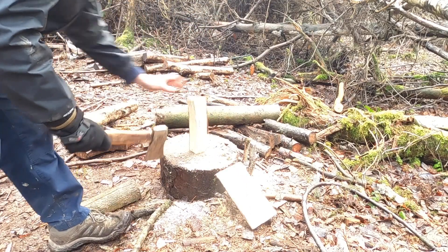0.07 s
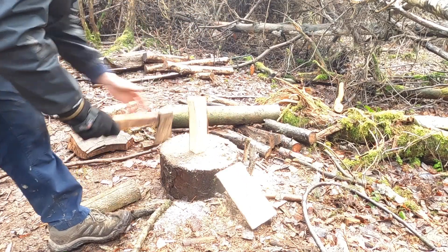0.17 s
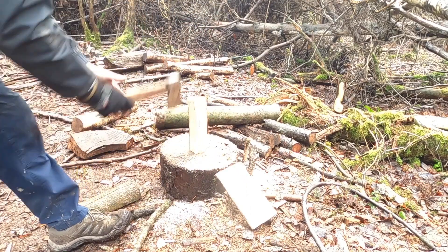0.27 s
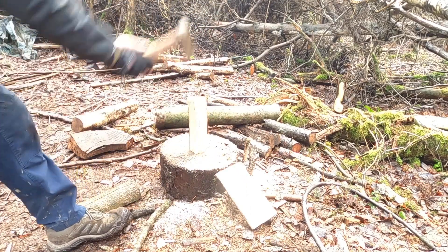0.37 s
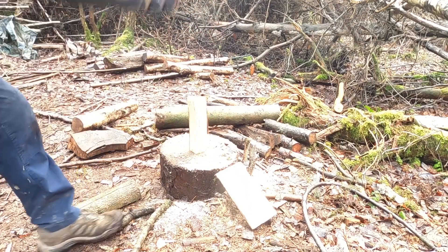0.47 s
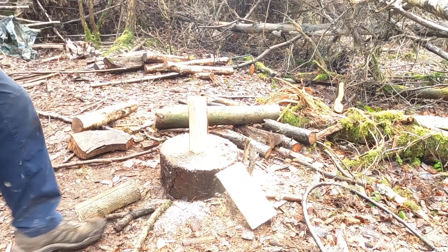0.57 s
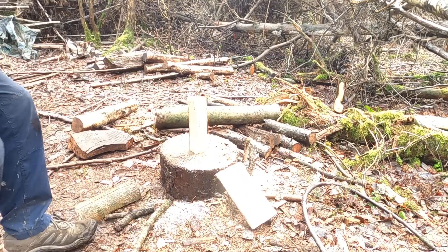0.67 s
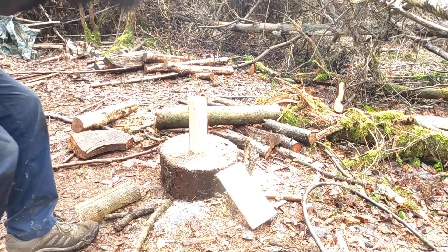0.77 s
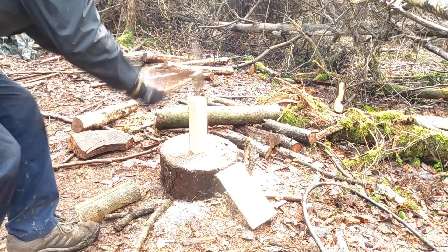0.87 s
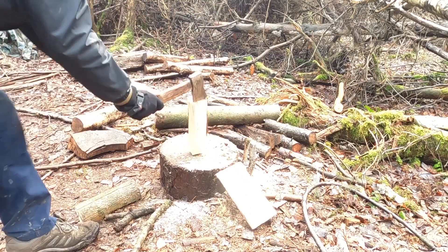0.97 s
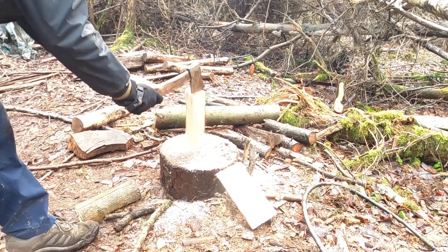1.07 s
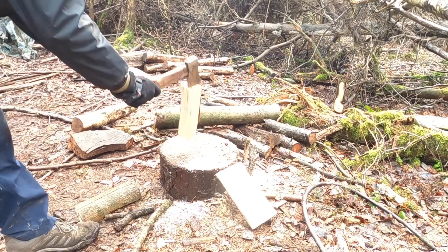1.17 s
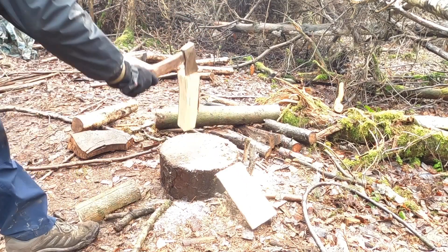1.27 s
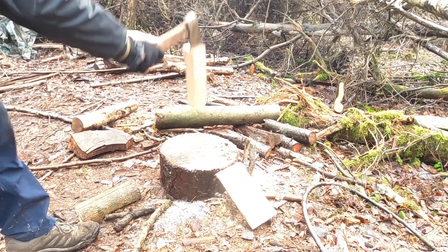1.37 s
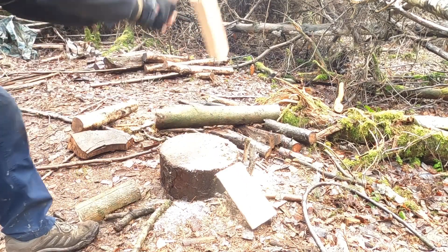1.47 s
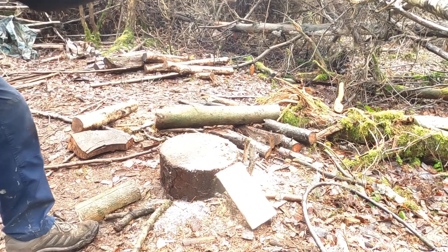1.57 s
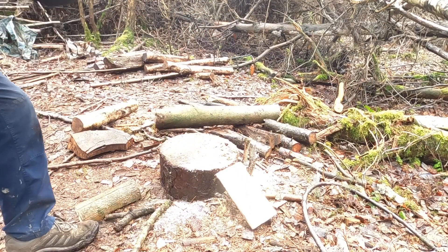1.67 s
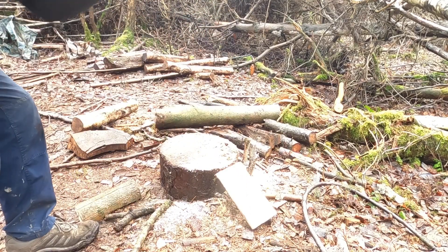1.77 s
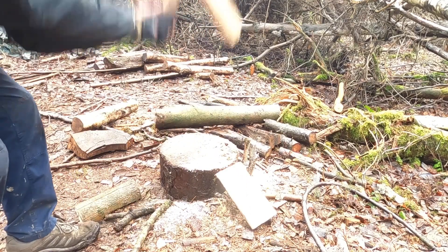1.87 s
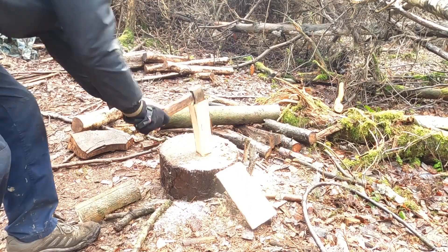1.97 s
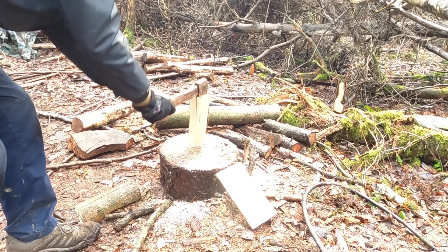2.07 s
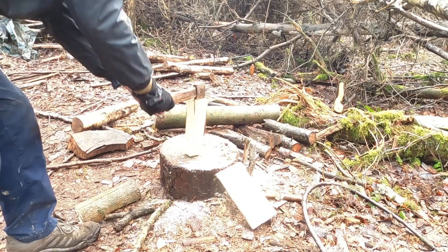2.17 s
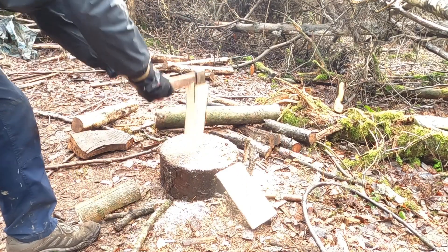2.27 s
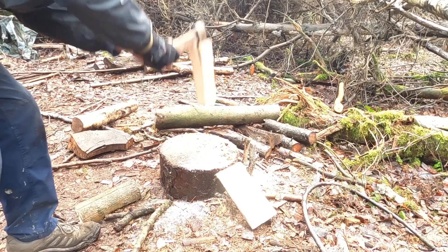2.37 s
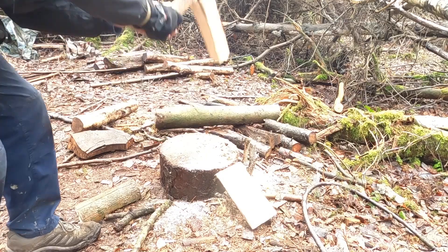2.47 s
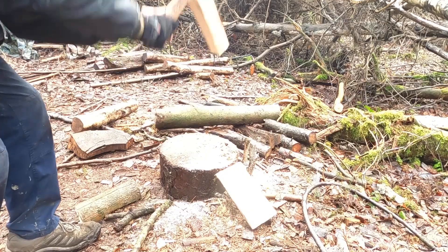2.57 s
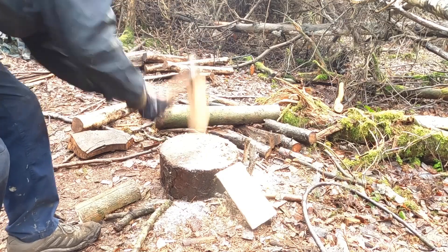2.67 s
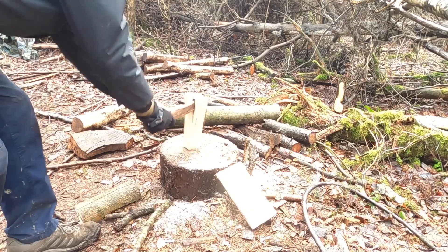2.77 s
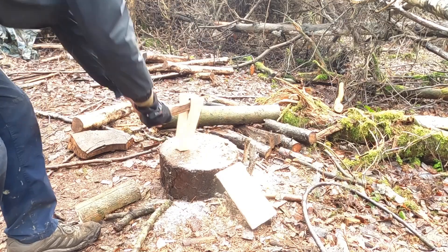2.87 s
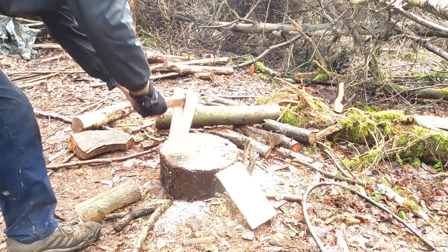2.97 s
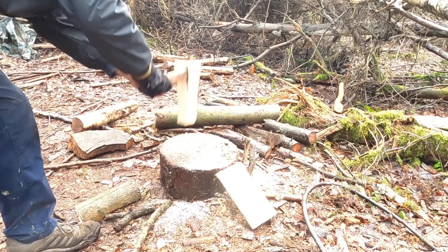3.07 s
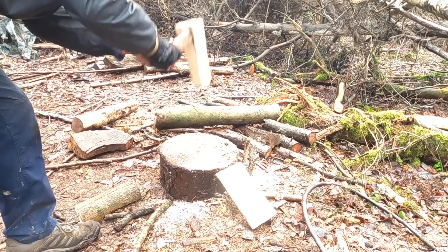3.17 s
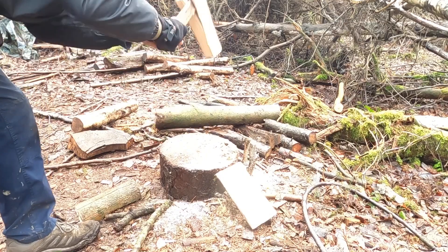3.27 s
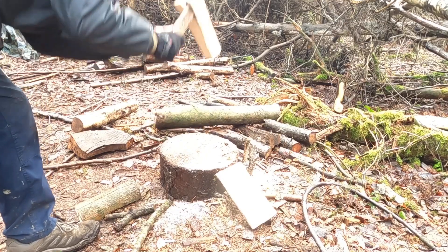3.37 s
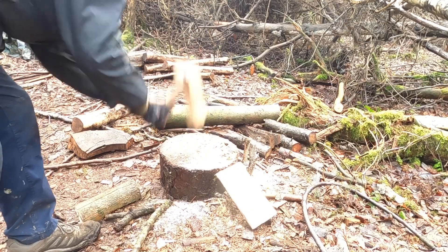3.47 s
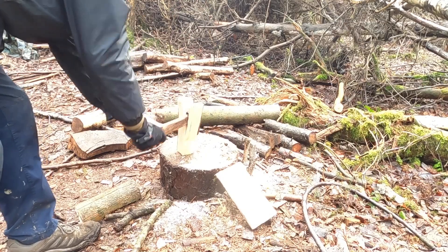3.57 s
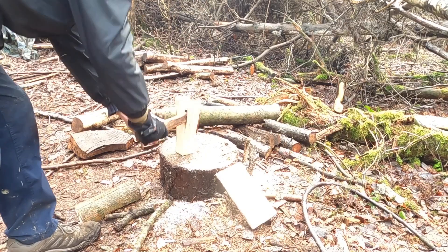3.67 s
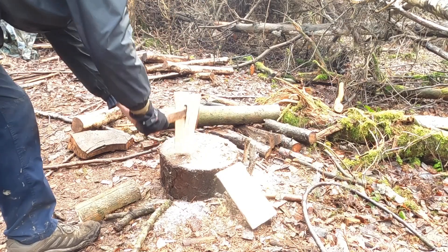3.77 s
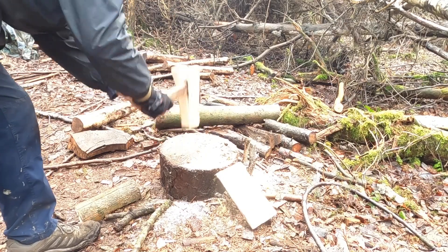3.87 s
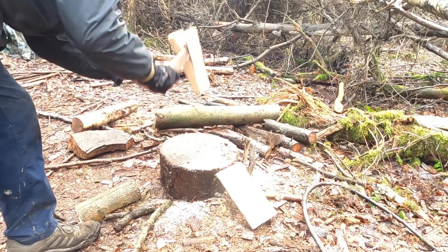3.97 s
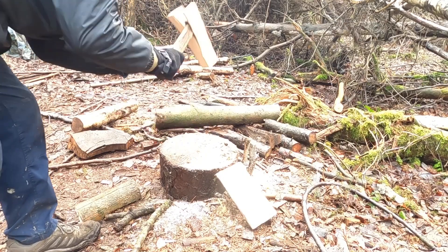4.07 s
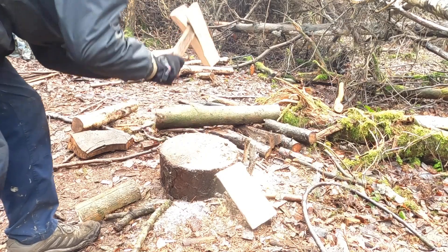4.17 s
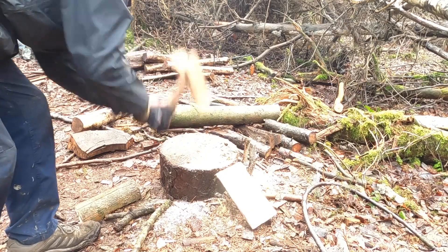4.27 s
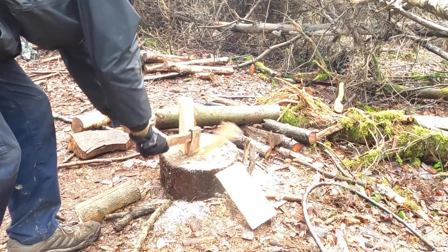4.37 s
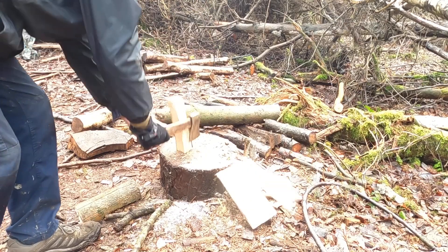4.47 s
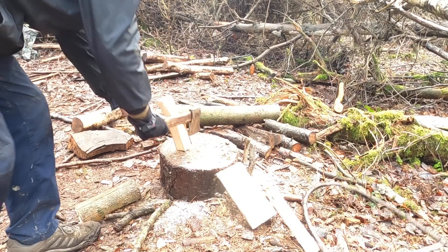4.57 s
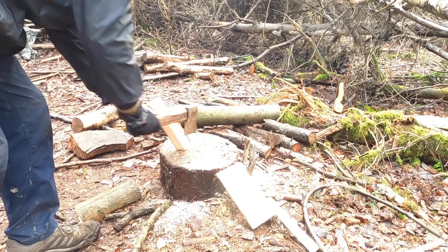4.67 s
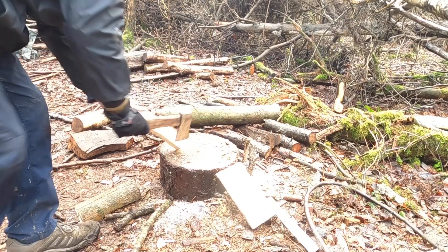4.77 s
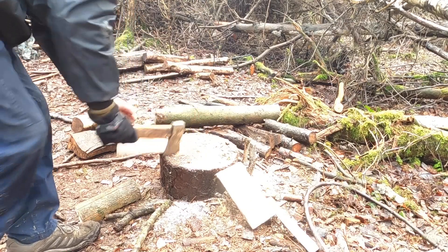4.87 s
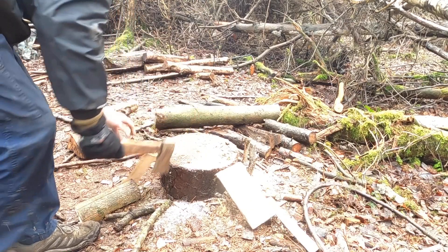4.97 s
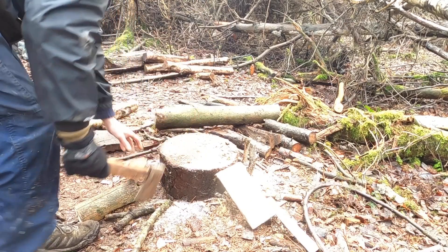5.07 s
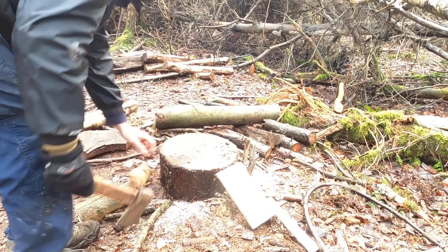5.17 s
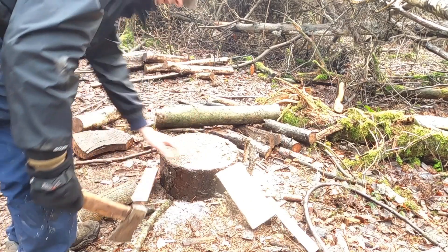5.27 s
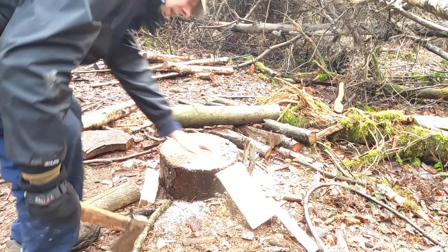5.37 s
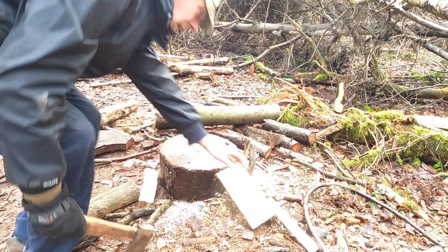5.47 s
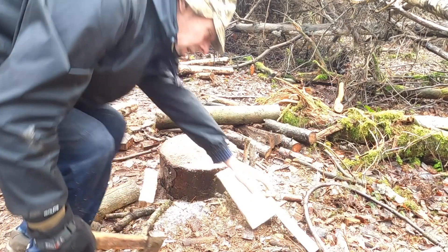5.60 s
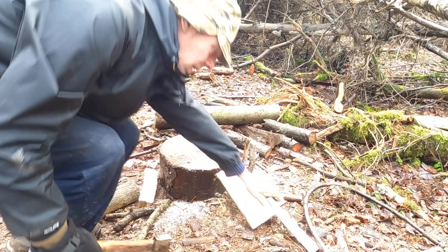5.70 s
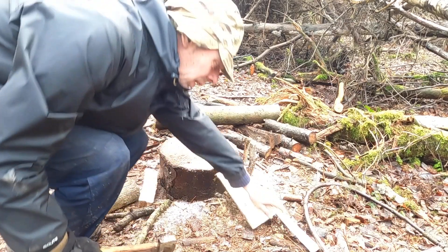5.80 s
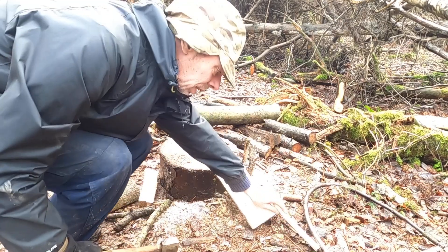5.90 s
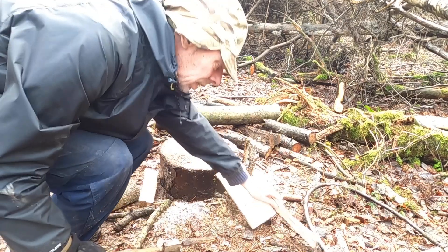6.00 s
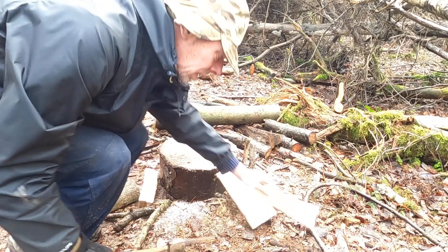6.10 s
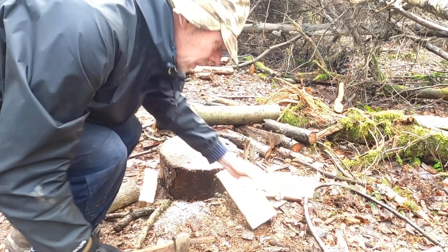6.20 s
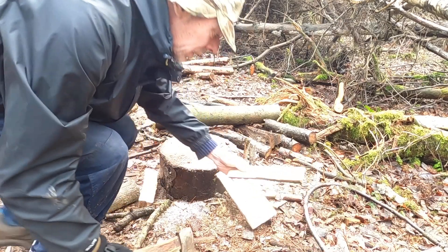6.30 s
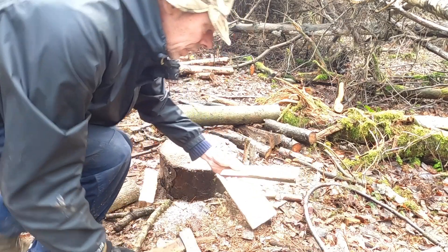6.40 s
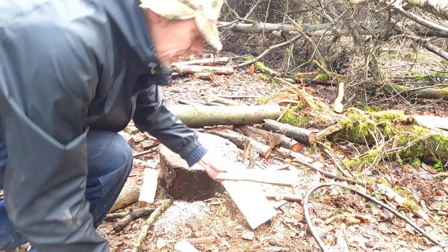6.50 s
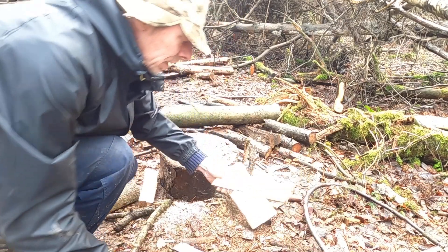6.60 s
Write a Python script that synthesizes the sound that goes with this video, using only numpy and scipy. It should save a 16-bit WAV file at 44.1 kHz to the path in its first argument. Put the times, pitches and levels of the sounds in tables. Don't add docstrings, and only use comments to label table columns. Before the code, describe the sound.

A quiet woodland with low wind rumble and faint far traffic, heard close in stereo. At the start a gust bumps the microphone, a jacket swishes, twigs tick and boots shift softly around 0.4-0.6 s. At 0.9 s a hatchet bites into a dry stick: a loud, hard crack with a short woody ring. The joined stick and hatchet are knocked on a log block at 2.0, 2.7 and 3.5 s, each a sharp knock with tearing fibres, a low soil thud and a late swelling echo from the trunks. At 4.3 s the stick splits; pieces clatter at 4.5-4.7 s and another lands near 5.0 s. A firmer small knock comes at 5.3 s amid brief sliding scrapes. Then cloth rustles, leaves stir, twigs tick and light wooden taps sound around 6.0-6.25 s, ending on a soft scrape and quiet wind by 6.6 s.

```python
import sys
import numpy as np
from scipy import signal
from scipy.fft import rfft, irfft
from scipy.io import wavfile
from scipy.ndimage import uniform_filter1d

SR = 44100
rng = np.random.default_rng(int(sys.argv[2]) if len(sys.argv) > 2 else 0)


def nominal_scale(level):
    x = np.asarray(level, float) / 20
    return 10 ** x


def persist_wave(psi):
    counts = np.round(np.clip(psi, -1, 1) * 32767).astype(np.int16)
    wavfile.write(sys.argv[1], SR, np.atleast_2d(counts).T)


N = 292779

# middle t/s, length/s, level/dB
GUSTS = [(0, 0.055, -27), (.1, 0.47, -43.5), (.3, 0.42, -48), (.5, 0.44, -39), (.76, 0.44, -45.5),
         (.97, 0.18, -36), (1.1, 0.25, -49), (1.45, 0.7, -53), (1.68, 0.23, -46.5), (1.85, 0.35, -48.5),
         (1.96, 0.2, -45), (2.12, 0.16, -48), (2.55, 0.47, -54.5), (3.3, 0.56, -49.5), (3.68, 0.55, -49),
         (4.22, 0.52, -51), (4.55, 0.44, -53), (4.8, 0.88, -52.5), (4.99, 0.21, -45.5), (5.2, 0.21, -46),
         (5.33, 0.13, -47), (5.62, 0.42, -52.5), (5.76, 0.17, -46), (5.97, .22, -45), (6.44, 0.58, -44),
         (6.64, .2, -59)]
# f/Hz, density/dB per Hz
RUMBLE = [(15, -15.5), (30, -1), (58, 0), (90, -8), (130, -21), (220, -34), (400, -58)]
LULL_DB, GUST_SWAY_DB, GUST_PAN_DB = -58, -0.5, 0.5
# f/Hz, correlation/1
LIKENESS = [(40, .75), (130, .85), (300, .75), (700, .72), (1500, .6), (3100, .55), (7000, .45),
            (15000, .2)]
# t/s, level/dB
STIR = [(0, -55.5), (.5, -54.5), (.88, -54.5), (1.0, -66.5), (1.399, -61), (1.96, -57.5), (2.01, -66),
        (2.6, -63.5), (2.849, -61.5), (3.05, -65.5), (3.6, -63), (3.9, -67.5), (4.55, -58), (4.78, -65),
        (5.349, -60), (5.95, -59), (6.201, -59.5), (6.64, -57)]
# f/Hz, density/dB per Hz
AIR = [(100, -11), (320, -16.5), (748, -18), (1840, -21.5), (2050, -33.5), (3050, -49.5), (7670, -44.5),
       (15000, -73)]
# middle t/s, length/s, level/dB
SWISHES = [(.09, 0.26, -66), (.21, 0.17, -70), (.33, 0.36, -64), (.53, 0.62, -60.5), (.7, .14, -63),
           (.83, .22, -57), (1.1, 0.53, -70), (1.36, 0.18, -74.5), (1.48, 0.4, -78), (1.57, .16, -69),
           (1.635, 0.2, -63.5), (1.8, 0.17, -66), (1.88, .15, -68), (2.4, 0.25, -72), (2.85, 0.57, -68.5),
           (3.1, 0.37, -75), (3.4, 0.45, -82), (3.62, 0.45, -72.5), (4.26, 0.14, -82), (4.46, 0.25, -73.5),
           (4.62, .2, -71.5), (4.9, 0.92, -74.5), (5.08, 0.13, -74.5), (5.2, 0.2, -76), (5.33, 0.4, -67),
           (5.65, 1, -67), (5.86, 0.21, -68.5), (6.0, 0.28, -75), (6.17, 0.72, -73.5), (6.48, 0.41, -64.5),
           (6.64, 0.18, -67)]
# f/Hz, density/dB per Hz
RUSTLE = [(500, -8.5), (1000, 4), (2000, 4), (3500, 2.5), (6000, -2.5), (9000, -1), (12000, -16.5),
          (16000, -40)]
DOWNSWINGS = [-64, -59.5, -68, -70, -77]
DOWNSWING_S, STILL_DB = 0.07, -81.5
# t/s, peak level/dB, f/Hz
TICKS = [(0.121, -40, 4400), (0.172, -45, 3800), (0.196, -41.5, 7500), (0.23, -39, 5880),
         (0.3111, -33, 8200), (.715, -40, 2800), (1.5339, -46, 4660), (2.3697, -46, 3376),
         (2.9042, -61, 3370), (2.9795, -37.5, 5000), (3.1004, -42.5, 3990), (3.2367, -48.5, 5200),
         (3.2995, -52, 8000), (3.3295, -51, 3240), (3.487, -41, 1993), (5.038, -54.5, 3165),
         (5.099, -40.5, 6050), (5.276, -46, 3590), (5.6376, -49.5, 3270), (5.7224, -41, 3760),
         (5.8198, -37.5, 4280), (5.8383, -37, 3620), (5.8924, -45, 3600), (5.971, -47.5, 3860),
         (6.1325, -62, 3600), (6.4088, -38, 7500), (6.4962, -35.5, 3160), (6.6218, -38, 7400),
         (4.925, -42, 6000), (4.932, -42, 6500), (4.94, -41, 6500), (1.81, -46, 3000), (1.657, -46, 2200),
         (1.92, -45, 2500), (5.106, -45, 4200), (3.056, -50, 2000), (3.14, -53, 9000), (3.2, -53, 2800),
         (5.757, -50, 8500)]
# t/s, level/dB, f/Hz, t60/s
STEPS = [
    (.42, -40, 380, .03),
    (.463, -37, 260, .03),
    (.485, -36, 330, .025),
    (.56, -37, 410, .05),
    (.85, -38.5, 320, .05),
    (1.57, -46, 300, .05),
    (3.558, -36, 330, .03),
    (3.57, -36, 360, .025),
    (4.965, -42, 520, .04),
    (5.3, -42, 350, .06),
]

# t/s, level/dB, f/Hz, t60/s
BLOWS = [
    (.9018, 13, 1896, 0.0058),
    (1.9775, 11, 1700, .0072),
    (2.7178, 13, 1800, 0.0058),
    (3.5289, 11, 1952, 0.0076),
    (4.3421, 9.5, 1450, .0065),
]
BLOW_TIMES = [s for s, *_ in BLOWS]
# level/dB, f/Hz
FORE_KNOCKS = [(-11.5, 790), (-13.5, 950), (-21.5, 740), (-17, 2900), (-16.5, 2700)]
# delay/s, level/dB, f/Hz, t60/s
REBOUNDS = [(.0013, -5.5, 1780, 0.0068), (.0011, 0.5, 1870, .011), (.0027, -8, 2000, 0.011),
            (.0015, -8.5, 2030, 0.014), (0.001423, -2.5, 2006, .016)]
# lower level/dB, f/Hz, upper level/dB, f/Hz
SIDE_MODES = [(2, 1100, -13, 2450), (0.5, 1080, -18.5, 2550), (0.5, 1080, -12.5, 2600),
              (1.5, 1120, -7, 2450), (2, 1100, -8.5, 2320)]
# level/dB, f/Hz, t60/s
BITES = [(-8, 2400, 0.008), (-13, 2200, 0.013), (-16.5, 2400, 0.0055), (-10, 2700, 0.012),
         (-14.5, 5000, 0.014)]
EDGE_TICKS = [-2, -14, -19, -12, -15]
# f/Hz, level/dB, t60/s
STICK_MODES = [(3600, -24.5, 0.01), (4670, -37.5, 0.013), (6480, -39, 0.0016)]
FORE_KNOCK_LEAD_S = .0006
LOWER_T60_S, UPPER_T60_S = .0085, 0.013
# t/s, level/dB, f/Hz, t60/s
SHORT_KNOCKS = [(.9022, -14, 820, .008), (.903, -17, 480, .014), (.9025, -17, 2600, .008),
                       (.9022, -10, 4100, .006), (.9035, -15, 9000, .004), (2.7214, -3, 6000, .002),
                       (2.7216, -13, 8600, .003), (1.979, -22, 700, .01), (1.9785, -22, 2900, .006),
                       (1.9795, -19, 370, .012), (1.979, -30, 5000, .005), (2.7195, -22, 4100, .005),
                       (3.5295, -22, 2550, .008), (3.683, -40, 1400, .02), (4.979, -35, 4000, .012),
                       (3.4872, -42, 1900, .01),
                       (0.9034, -15, 661, 0.011), (1.98, -17, 427, 0.011), (2.7193, -15.5, 500, .012),
                (3.531, -24, 490, .014), (3.5305, -17, 370, 0.016), (4.344, -29, 746, 0.075),
                (4.371, -34.5, 755, 0.11), (4.5436, -23, 586, 0.078), (4.545, -29.5, 472, 0.058),
                (4.56, -35.5, 540, 0.063), (5.305, -45, 760, .04), (6.017, -50, 1900, .02),
                (6.093, -53, 2670, .015), (6.1333, -44, 1450, 0.014), (5.894, -46, 1450, 0.023),
                (5.895, -48, 3600, .015), (4.116, -47.5, 1198, .012), (2.517, -49, 1145, 0.009),
                (4.7, -43, 1800, 0.018), (4.575, -44.5, 2820, .012), (5.279, -21, 480, 0.0099),
                (4.5436, -15.5, 1000, 0.0086), (4.5437, -27, 1380, 0.047), (4.5435, -15.5, 1660, 0.0114),
                (4.5445, -27.5, 2225, 0.026), (4.547, -22, 2970, 0.01), (4.671, -33, 1104, 0.036),
                (4.671, -29.5, 1440, 0.014), (4.672, -41.5, 2420, 0.023), (4.9795, -32.5, 1484, 0.015),
                (4.9777, -37.5, 2036, 0.042), (4.979, -27, 2890, 0.0058), (5.2145, -33.5, 480, 0.024),
                (5.2145, -40, 900, .008), (5.279, -33.5, 743, 0.07), (5.279, -35, 1820, 0.065),
                (5.278, -37.5, 2056, 0.052), (6.003, -46.5, 1880, 0.025), (6.02, -58.5, 3170, .1),
                (6.2468, -31, 2450, 0.009), (6.247, -35, 3260, 0.017), (4.672, -36, 450, .015)]
# level/dB, f/Hz, t60/s
BLOCK = [(-2, 260, 0.011), (-4.5, 225, 0.017), (-7, 205, 0.049), (-10, 235, 0.03), (1, 270, 0.0098)]
# level/dB, f/Hz
BOOMS = [(-11.5, 74.7), (-22, 87.4), (-20.5, 86.5), (-18, 96), (-15.5, 79.5)]
PUSH_S = 0.00087
BOOM_S, BOOM_T60_S, BOOM_PAN_DB = 0.0022, .11, 2
# t/s, level/dB, f/Hz, t60/s, left-right/dB
SETTLES = [
    (1.9876, -14.5, 239, 0.013, 5),
    (2.724, -14, 68.7, 0.033, -23.5),
    (2.7263, -28.5, 189.2, 0.1, -7),
    (2.884, -17.5, 210.2, 0.01, 1.5),
    (3.5366, -22.5, 238, 0.084, -2),
    (3.6825, -20.5, 218, 0.016, 0.5),
    (4.353, -21, 183, .092, 0.5),
    (4.3715, -12, 260.7, 0.013, 0.5),
    (5.2803, -17, 298, 0.0056, 1),
]
# t/s, level/dB, f/Hz, t60/s
LANDINGS = [
    (1.992, -29, 173, .12),
    (3.702, -35, 200, 0.042),
    (4.559, -36.5, 90, 0.21),
    (4.982, -38, 61.8, 0.2),
    (4.986, -31, 114.2, 0.056),
    (6.004, -23.5, 283, 0.0072),
]
# t/s, level/dB, f/Hz, t60/s, left-right/dB
CRACKS = [(0.931, -51.5, 3600, 0.097, 4), (2.7213, -10, 4400, 0.004, -1.5), (2.722, -26.5, 706, 0.042, 4),
          (2.723, -32, 2630, 0.062, 7), (2.884, -37, 2000, 0.018, 3.5), (3.531, -2, 3100, 0.0029, 1),
          (3.533, -35.5, 2500, 0.053, -1), (3.537, -37, 2200, 0.022, 3), (3.681, -40, 1000, 0.025, 8.5),
          (3.683, -50.5, 2800, 0.018, 4), (4.347, -31, 3600, 0.064, -3), (4.371, -34.5, 814, 0.067, 3),
          (4.5455, -21, 1475, 0.034, -5), (4.5441, -27, 7980, .012, 0), (4.549, -30, 2810, 0.031, -4),
          (4.572, -45, 1950, 0.058, 0), (4.6705, -47, 3020, 0.042, -3), (4.979, -38, 5200, 0.031, 1),
          (5.296, -43, 5500, 0.026, -23), (6.237, -42.5, 4100, .015, -1), (6.2465, -49.5, 3200, 0.0293, 13),
          (2.7235, -24, 3000, .008, 0.5), (2.7295, -32, 2500, .008, 0.5), (.9045, -26, 6000, .008, 0.5),
          (5.333, -52, 6500, .02, 0.5), (.925, -43, 310, .16, 0.5), (2.0, -47, 290, .16, 0.5),
          (2.74, -44, 330, .14, 0.5), (3.535, -31, 680, .05, 0.5), (2.884, -52, 7000, .015, 0.5)]
# level/dB, f/Hz, t60/s, treble level/dB
ECHOES = [(-29.5, 1750, .0045, 6.5), (-33, 1850, .005, 4.5), (-32.5, 2000, .0055, 7.5),
          (-30, 2080, .008, 9), (-28.5, 2006, .005, 6.5)]
# t/s, length/s, level/dB, f/Hz, bandwidth/Hz
SCRAPES = [(4.916, .039, -58, 6300, 3480), (5.085, .08, -55, 3000, 2000), (5.12, .2, -59, 2720, 160),
           (5.28, .09, -56, 1820, 120), (5.225, .15, -57, 1980, 230), (6.225, .06, -52, 2900, 900),
           (6.245, .045, -56, 3300, 2100), (6.39, .16, -57, 8600, 5400), (6.423, .15, -54, 2963, 2496),
           (5.08, .1, -58, 2100, 300), (5.17, .12, -65, 3950, 200)]
# f/Hz, level/dB
LEFT_PORT = [(80, 0), (160, -1), (320, 0), (1250, -.8), (1900, .2), (2800, 1.4), (5000, 0), (8000, -1.5)]
LEFT_LAG_S, LEFT_TURN_RAD = 2.9e-5, .26
LAG_TOP_HZ = 8500
# step level/dB, low ring level/dB, f/Hz, whistle level/dB
LEAD_INS = [(-22, -19, 870, -37), (-19, -21, 870, -47), (-26, -31, 880, -46), (-22.5, -29, 850, -45),
            (-23, -25, 950, -42)]
LEAD_STEP_S, TOP_HZ = 512 / 48000, 15800
LEAD_T60_S, WHISTLE_HZ, WHISTLE_T60_S = .04, 7900, .045


def at_hz(points, hz):
    points = np.array(points)
    return np.interp(np.log(hz), np.log(points[:, 0]), points[:, 1])


def rms_one(x):
    return x / np.sqrt(np.mean(x ** 2) + 1e-20)


def drift(rate):
    r = np.exp(-80 * np.pi * rate / SR)
    slow = signal.lfilter([1], [1, -2 * r, r * r], rng.standard_normal(N // 40 + 2002))[2000:]
    return np.interp(np.arange(N) / 40, np.arange(len(slow)), rms_one(slow))


def dying(t60):
    t = np.arange(int(1.3 * t60 * SR) + 8) / SR
    return t, np.exp(-np.log(1000) * t / t60)


def mode(hz, t60, rise_cycles):
    t, envelope = dying(t60)
    rise = 1 - np.exp(-t * hz / rise_cycles)
    return np.sin(2 * np.pi * hz * t) * envelope * rise


def burst(hz, t60, wide=2.2):
    t, envelope = dying(t60)
    band = signal.butter(2, [hz / wide, min(hz * wide, .45 * SR)], "band", fs=SR, output="sos")
    return rms_one(signal.sosfilt(band, rng.standard_normal(len(t)))) * envelope


def add(out, s, sound, db, pan_db=0):
    i = round(s * SR)
    channel_db = db + pan_db * np.array([[.5], [-.5]]) - abs(pan_db) / 2
    out[:, i:i + len(sound)] += sound[:N - i] * nominal_scale(channel_db)


def banded_noise(spectrum, low_hz, high_hz, patchy_db, rate):
    out, together = 0, drift(rate / 3)
    edges = low_hz * 2 ** np.arange(0, np.log2(high_hz / low_hz) + .1, .5)
    white = rng.standard_normal((2, 2, N))
    for k, (low, high) in enumerate(zip(edges, edges[1:])):
        band = signal.butter(2, [low, high], "band", fs=SR, output="sos")
        mid, side = signal.sosfilt(band, white[k % 2])
        centre_hz = np.sqrt(low * high)
        alike = np.clip(at_hz(LIKENESS, centre_hz), 0, 1)
        flicker_db = patchy_db * (1.3 * together + drift(rate))
        gain = nominal_scale(at_hz(spectrum, centre_hz) + flicker_db)
        out = out + gain * (np.sqrt(1 + alike) * mid + np.sqrt(1 - alike) * side * [[1], [-1]])
    return rms_one(out)


def swells(rows, floor_db):
    t, power = np.arange(N) / SR, nominal_scale(2 * floor_db)
    for middle, length, db in rows:
        phase = np.pi * np.clip((t - middle) / length, -.5, .5)
        power = power + nominal_scale(2 * db) * np.cos(phase) ** 4
    return power


def wind():
    pan_db = GUST_PAN_DB + GUST_SWAY_DB * drift(3.0)
    gain = np.sqrt(swells(GUSTS, LULL_DB)) * nominal_scale(pan_db * np.array([[.5], [-.5]]))
    return gain * banded_noise(RUMBLE, 13, 340, patchy_db=1.0, rate=10.0)


def litter():
    stir_db = np.interp(np.arange(N) / SR, *np.transpose(STIR))
    return nominal_scale(stir_db + 3.5) * banded_noise(AIR, 100, 13000, patchy_db=1.6, rate=21.0)


def jacket():
    power = swells(SWISHES, STILL_DB)
    for s, db in zip(BLOW_TIMES, DOWNSWINGS):
        before = s - np.arange(N) / SR
        power += nominal_scale(2 * db) * np.exp(-np.abs(before) / DOWNSWING_S) * (before > 0)
    return np.sqrt(power) * nominal_scale(9.0) * banded_noise(RUSTLE, 550, 18000, patchy_db=1.0, rate=75.0)


def lone_ticks():
    out = np.zeros((2, N))
    for s, db, hz in TICKS:
        add(out, s, burst(hz, 0.0055, wide=1.7), db - 3.0)
    return out


def footfalls():
    out = np.zeros((2, N))
    for s, db, hz, t60 in STEPS:
        add(out, s, mode(hz, t60, 1.2), db)
    return out


def blows():
    out = np.zeros((2, N))
    for s, (db, hz) in zip(BLOW_TIMES, FORE_KNOCKS):
        add(out, s - FORE_KNOCK_LEAD_S, mode(hz, 0.0066, 0.66), db)
    for (s, db, hz, t60), (bite_db, bite_hz, bite_t60), edge_db in zip(BLOWS, BITES, EDGE_TICKS):
        add(out, s, mode(hz, t60, 1.6), db)
        add(out, s, burst(bite_hz, bite_t60), bite_db, -1.5)
        add(out, s + .0002, mode(11500, 0.0009, 0.3), edge_db)
        for mode_hz, mode_db, mode_t60 in STICK_MODES:
            add(out, s, mode(mode_hz, mode_t60, 0.99), db + mode_db)
    for s, (lower_db, lower_hz, upper_db, upper_hz) in zip(BLOW_TIMES, SIDE_MODES):
        add(out, s, -mode(lower_hz, LOWER_T60_S, 1.2), lower_db)
        add(out, s, -mode(upper_hz, UPPER_T60_S, 1.1), upper_db)
    for s, (after, db, hz, t60) in zip(BLOW_TIMES, REBOUNDS):
        add(out, s + after, mode(hz, t60, 1.2), db)
    return out


def short_knocks():
    out = np.zeros((2, N))
    for s, db, hz, t60 in SHORT_KNOCKS:
        add(out, s, mode(hz, t60, 0.057), db)
    return out


def thuds():
    out = np.zeros((2, N))
    for s, (db, hz, t60), (boom_db, boom_hz) in zip(BLOW_TIMES, BLOCK, BOOMS):
        add(out, s + PUSH_S, -mode(hz, t60, 0.34), db)
        add(out, s + BOOM_S, mode(boom_hz, BOOM_T60_S, 0.065), boom_db, BOOM_PAN_DB)
    for s, db, hz, t60, pan_db in SETTLES:
        add(out, s, -mode(hz, t60, 0.025), db, pan_db)
    for s, db, hz, t60 in LANDINGS:
        add(out, s, mode(hz, t60, 0.067), db, BOOM_PAN_DB)
    return out


def cracks():
    out = np.zeros((2, N))
    for s, db, hz, t60, pan_db in CRACKS:
        add(out, s, burst(hz, t60), db, pan_db)
    return out


def sent_out():
    out = np.zeros((2, N))
    for s, (db, ring_hz, t60, treble_db) in zip(BLOW_TIMES, ECHOES):
        add(out, s, mode(ring_hz, t60, .1), db + 1.5)
        add(out, s, mode(ring_hz * 0.52, 0.0049, 0.081), db - 14.0)
        add(out, s, mode(ring_hz * 1.43, 0.001, 0.093), db + treble_db)
        add(out, s, mode(ring_hz * 1.85, 0.003, 0.1), db + treble_db - 24.0)
    return out


def trees(x, peak_s, t60, near_db):
    t, envelope = dying(t60)
    swell = envelope * (nominal_scale(near_db) + (1 - np.exp(-t / peak_s)) ** 3)
    left, right, shared = rng.standard_normal((3, len(t))) * swell
    echoes = np.array([left, right]) + shared
    dull = signal.lfilter([.3], [1, -.7], echoes)
    echoes = dull + 0.21 * echoes * np.exp(-t / .25)
    echoes = signal.sosfilt(signal.butter(2, [900, 8000], "band", fs=SR, output="sos"), echoes)
    echoes = echoes / np.sqrt(np.sum(echoes ** 2))
    return signal.fftconvolve(x.mean(axis=0)[None], echoes)[:, :N]


def scrapes():
    out = np.zeros((2, N))
    for s, length, db, hz, width_hz in SCRAPES:
        band = signal.butter(1, [hz - width_hz / 2, hz + width_hz / 2], "band", fs=SR, output="sos")
        grains = rng.standard_normal(int(length * SR)) ** 3
        add(out, s, rms_one(signal.sosfilt(band, grains)) * np.hanning(len(grains)), db)
    return out


def through_air(x):
    return signal.sosfilt(signal.butter(1, 12000, fs=SR, output="sos"), x)


def through_soil(x):
    return signal.sosfilt(signal.butter(1, 1200, fs=SR, output="sos"), x + 1e-18)


def ports(x):
    hz = np.fft.rfftfreq(N, 1 / SR)
    lag_rad = 2 * np.pi * np.minimum(hz, LAG_TOP_HZ) * LEFT_LAG_S + LEFT_TURN_RAD
    left = nominal_scale(at_hz(LEFT_PORT, hz + 1)) * np.exp(-1j * lag_rad)
    return np.array([irfft(rfft(x[0]) * left, N), x[1]])


def scene():
    around = wind() + litter() + jacket()
    wood = through_air(lone_ticks() + blows() + short_knocks() + cracks() + scrapes())
    ground = through_soil(footfalls() + thuds())
    echoes = nominal_scale(2.2) * trees(sent_out(), peak_s=0.2, t60=0.68, near_db=-34)
    return around + ports(wood + ground) + echoes


def lead_in(x, step_db, blur_db):
    starts = [s - .05 for s in BLOW_TIMES[1:]]
    ghost_db = np.array(LEAD_INS)[np.searchsorted(starts, np.arange(N) / SR), 0]
    loud = x * (uniform_filter1d(np.abs(x), size=131) > .12) * nominal_scale(ghost_db)
    ghost = nominal_scale(blur_db) * rng.standard_normal((4, round(LEAD_STEP_S * SR)))
    ghost[:, 0] = 1
    kernel = (ghost * nominal_scale(step_db * np.arange(4)[::-1, None])).ravel()
    ahead = signal.fftconvolve(loud, kernel[None])[:, -N:]
    ahead = signal.sosfilt(signal.butter(2, [260, 6500], "band", fs=SR, output="sos"), ahead)
    for s, (_, low_db, low_hz, whistle_db) in zip(BLOW_TIMES, LEAD_INS):
        for hz, t60, db in (low_hz, LEAD_T60_S, low_db), (WHISTLE_HZ, WHISTLE_T60_S, whistle_db):
            ring = mode(hz, t60, 0.6)[::-1]
            add(ahead, s - len(ring) / SR, ring, db)
    return ahead


def roll_off(x):
    return signal.sosfilt(signal.butter(12, 16470, fs=SR, output="sos"), x)


def record(dry):
    x = np.clip(dry, -1.05, 1.05)
    early = lead_in(x, step_db=-11.5, blur_db=-33.0)
    hz = np.fft.rfftfreq(N, 1 / SR)
    step_down = nominal_scale(-9 * np.clip((hz - 7890) / 60, 0, 1))
    x = irfft(rfft(x + early) * step_down, N)
    x = signal.sosfilt(signal.butter(6, TOP_HZ, fs=SR, output="sos"), np.clip(x, -1, 1))
    return roll_off(np.clip(x, -1, 1))


dry = scene()
out = record(dry)
persist_wave(out)
```